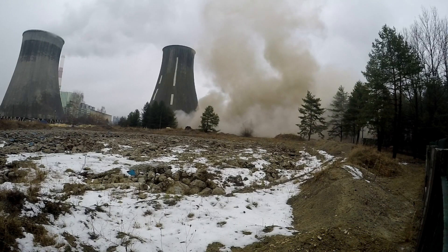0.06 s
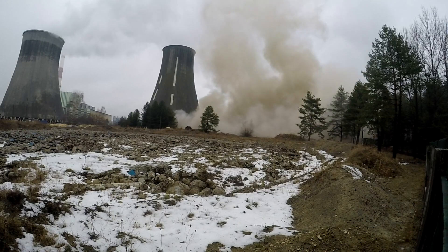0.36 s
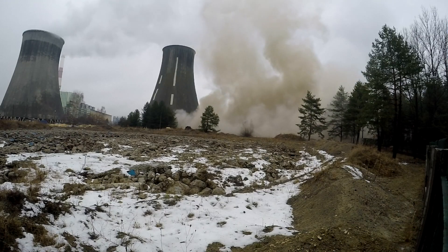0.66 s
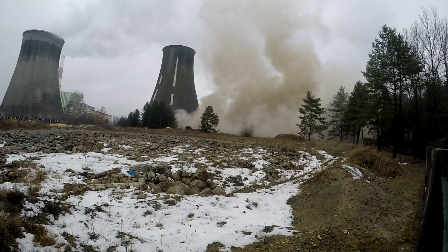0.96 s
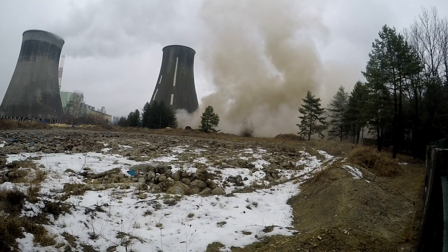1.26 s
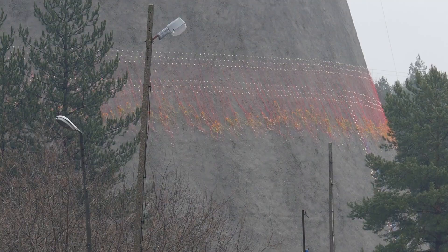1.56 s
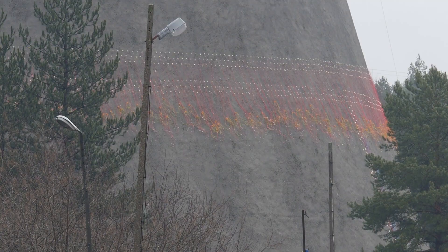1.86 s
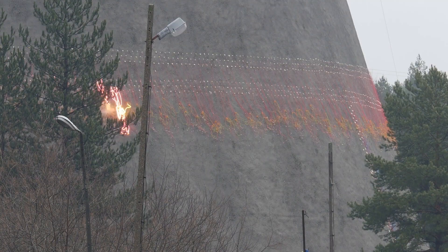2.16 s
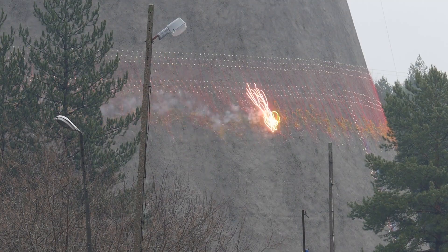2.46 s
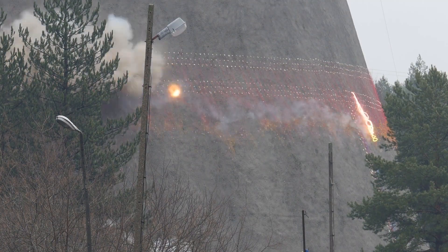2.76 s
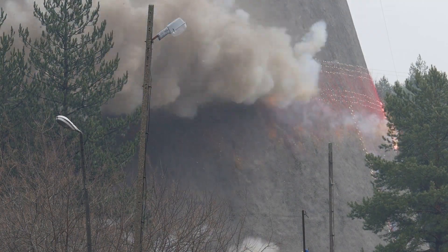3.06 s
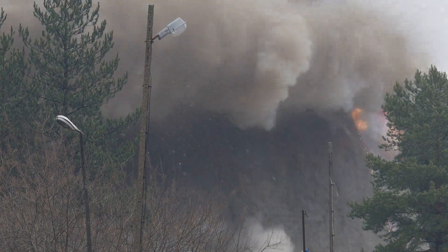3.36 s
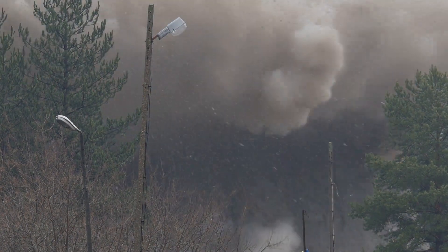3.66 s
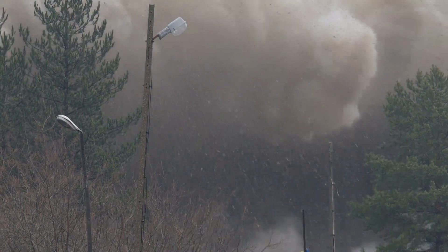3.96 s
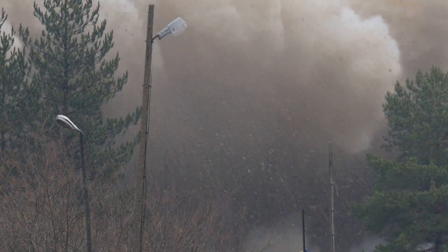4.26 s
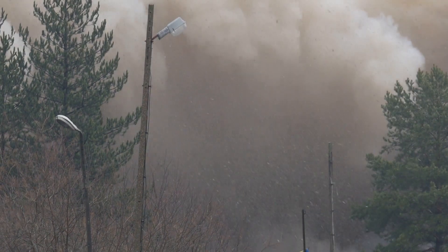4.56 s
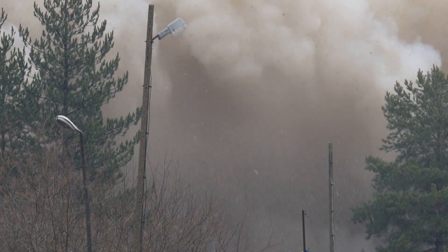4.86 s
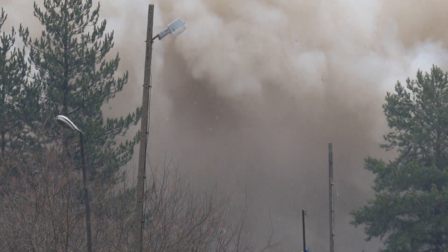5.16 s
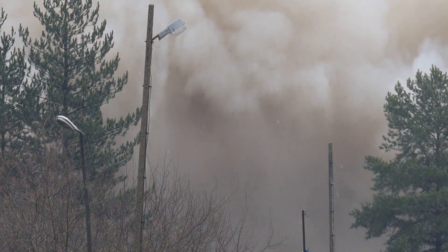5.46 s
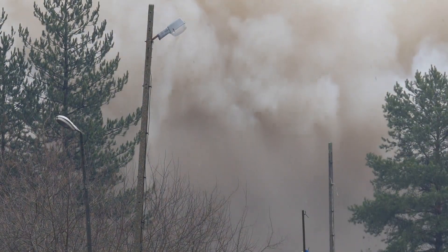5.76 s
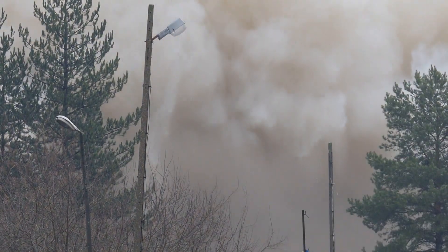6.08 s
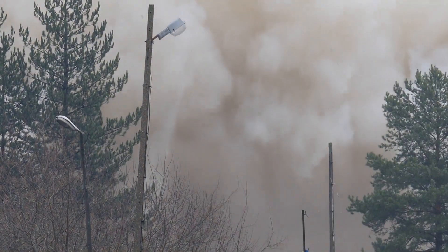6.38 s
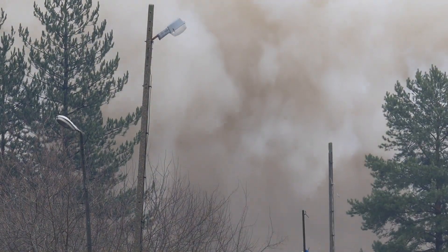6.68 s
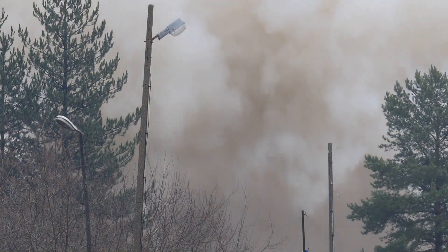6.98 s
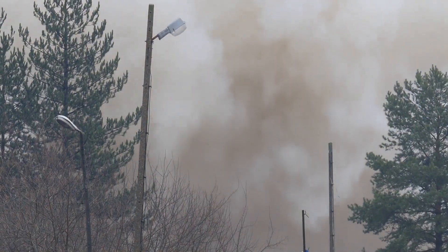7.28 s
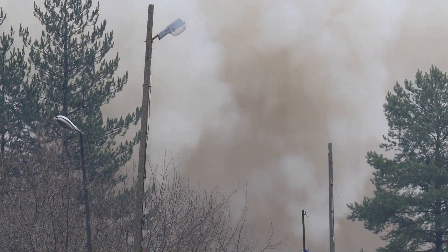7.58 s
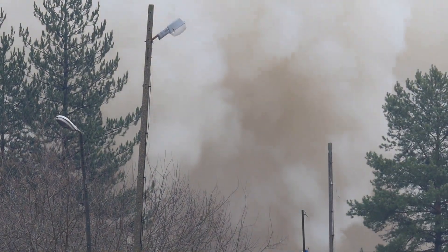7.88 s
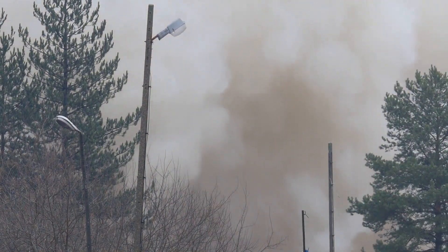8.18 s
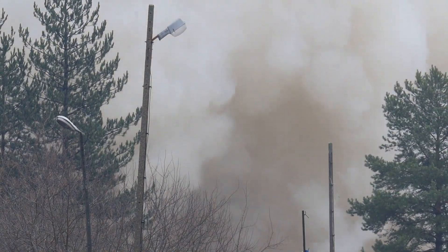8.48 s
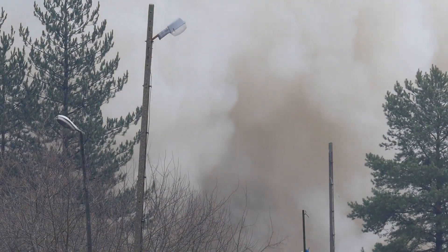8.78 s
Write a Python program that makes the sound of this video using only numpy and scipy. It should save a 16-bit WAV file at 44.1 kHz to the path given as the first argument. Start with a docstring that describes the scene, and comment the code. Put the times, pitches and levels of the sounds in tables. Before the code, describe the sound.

Outdoors at a demolition site, a faint breeze is followed by steady airy noise and a far machine hum. Suddenly explosives fire with a loud bang, a rapid string of smaller blasts and deep booms. The concrete tower comes down some way from the microphone, crackling and thudding inside a continuous low roar. The cracks thin out, leaving a few small ticks and a muffled rumble.

```python
"""A concrete cooling tower is blown down, heard across open winter ground. First comes a quiet field with
light wind; at 1.5 s it gives way to the closer air of the site, where distant machinery hums. Near 2.9 s
one hard bang sets off a ripple of delayed charges and two deep booms. Then the shell collapses: countless
dull impacts superpose into a long roar, and the strongest steepen into crackling shock fronts. These thin
out, a few last fragments tick near 7 s, and the roar ends blurred by scattering from ground and trees."""
import sys
import numpy as np
from scipy import signal
from scipy.fft import rfft, irfft
from scipy.io import wavfile
from scipy.ndimage import uniform_filter1d, minimum_filter1d

SR = 44100
rng = np.random.default_rng(int(sys.argv[2]) if len(sys.argv) > 2 else 0)


def to_wav(s):
    """Save 16-bit WAV."""
    ch = np.atleast_2d(s).T  # columns
    pcm = np.round(np.clip(ch, -1, 1) * 32767)  # PCM
    wavfile.write(sys.argv[1], SR, pcm.astype(np.int16))


N = 393813
T = np.arange(N) / SR
SITE_S = 1.54  # the open field gives way to the site


def undb(db):
    """Amplitude ratio of a level; the levels in the tables are relative."""
    return 10 ** (np.asarray(db) / 20)


def unit(x):
    """Normalisation to an rms of 1."""
    return x / np.sqrt(np.mean(x ** 2))


def curve(points):
    """Linear interpolation of (time, value) points."""
    return np.interp(T, *np.transpose(points))


def response(points, size=4096):
    """Minimum phase: the tightest causal pulse with a given spectrum."""
    hz, db = np.transpose(points)
    bins = np.maximum(np.arange(size // 2 + 1) * SR / size, 1)
    magnitude = undb(np.interp(np.log(bins), np.log(hz), db))
    cepstrum = irfft(np.log(magnitude))
    cepstrum[1:size // 2] *= 2
    cepstrum[size // 2 + 1:] = 0
    return irfft(np.exp(rfft(cepstrum)))


def colour(x, points):
    """Convolution imposes a spectrum on a signal."""
    return signal.oaconvolve(x, response(points))[:N]


def band(x, lo_hz, hi_hz, order=3):
    """Zero-phase filtering passes a band without delay."""
    sos = signal.butter(order, [lo_hz, min(hi_hz, .45 * SR)], "band", fs=SR, output="sos")
    return signal.sosfiltfilt(sos, x, padtype="even", padlen=SR // 2)


def resonance(x, hz, width_hz):
    """A second-order resonator passes a narrow band."""
    return signal.lfilter(*signal.iirpeak(hz, hz / width_hz, fs=SR), x)


def smear(x, hz):
    """Dispersion: an all-pass spreads a steep front over a fraction of a millisecond."""
    pole = np.exp(-2 * np.pi * hz / SR)
    return signal.lfilter([-pole, 1], [1, -pole], x)


def walk(per_s):
    """Smoothed random steps give a slow fluctuation of rms 1."""
    k = int(SR / per_s)
    steps = np.repeat(rng.standard_normal(N // k + 1), k)
    return unit(uniform_filter1d(uniform_filter1d(steps, k), k)[:N])


def impulses(events):
    """One spike per (time, level) event; each arrival is shifted at random by a few samples."""
    times, db = np.transpose(events)
    spikes = np.zeros(N)
    arrivals = np.round(times * SR).astype(int) + rng.integers(-3, 4, len(times))
    np.add.at(spikes, arrivals, undb(db))
    return spikes


def debris(per_s, spread_db):
    """A Poisson process: blows at random moments, many small and a few large."""
    happens = rng.random(N) < per_s / SR
    return happens * undb(spread_db * np.minimum(rng.exponential(size=N), 3.5))


def shocks(spikes, spectrum):
    """Impulse response: each spike becomes a slightly dispersed pressure pulse."""
    return smear(colour(spikes, spectrum), hz=2220) / np.abs(response(spectrum)).max()


def scatter(spikes, t60_s):
    """Scattering from ground and trees turns each spike into a dying tail of equal energy."""
    keep = np.exp(-2 * np.log(1000) / (t60_s * SR))
    power = signal.lfilter([1 - keep], [1, -keep], spikes ** 2 + 1e-18)
    return np.sqrt(power) * rng.standard_normal(N)


def stereo(mid, other, width, lean):
    """Interaural differences: a second signal gives width, unequal levels lean each band to one side."""
    side = colour(other, width)
    left = colour(mid + side, [(hz, db / 2) for hz, db in lean])
    right = colour(mid - side, [(hz, -db / 2) for hz, db in lean])
    return np.array([left, right])


def air(spectrum, db, flutter_db):
    """Outdoor ambient noise, with optional slow amplitude modulation."""
    return unit(colour(rng.standard_normal(N), spectrum)) * undb(db + flutter_db * walk(4.4))


def hum(hz, db, drift, waver_db):
    """Propagation through the air makes a far tone waver in pitch and level."""
    phase = 2 * np.pi * np.cumsum(hz * (1 + drift * walk(14))) / SR
    return np.sqrt(2) * np.sin(phase) * undb(db + waver_db * walk(9.65))


# Field air, its width (side minus mid), and the tones of a far mains hum: f/Hz, level/dB
FIELD_AIR = [(15, -10), (42, -2), (70, -8), (125, -19), (175, -15), (230, -22), (500, -19.5), (850, -16.5),
             (2100, -24), (2500, -29), (4150, -31.5), (4650, -34), (5150, -29.5), (7400, -45.5),
             (14000, -61)]
FIELD_WIDTH = [(60, -39), (300, -34), (1000, -47), (8000, -29)]
MAINS_TONES = [(49.5, -50), (100, -59), (360.5, -68), (721.5, -66), (3133, -71)]
def field():
    """Wind modulates the bass of the ambient noise, beside a mains hum and a thin high whine."""
    tones = sum(hum(hz, db, drift=.004, waver_db=2.5) for hz, db in MAINS_TONES)
    whine = undb(-82) * unit(band(rng.standard_normal(N), 8400, 8650))
    mid, other = (air(FIELD_AIR, db=-44, flutter_db=.4) for _ in range(2))
    side = colour(other, FIELD_WIDTH)
    gusts = unit(undb(4.5 * walk(per_s=7.4)))
    buffets = band(mid, 20, 110) * (gusts - 1)
    return np.array([mid + side, mid - side]) + buffets + tones + whine


# Site air, its width (side minus mid) and its lean (left minus right): f/Hz, level/dB
SITE_AIR = [(21, -67), (35, -25.5), (81, -7.5), (182, -7), (217, -2), (280, -5.5), (453, -3), (1020, -6.5),
            (1160, -5.5), (2020, -14.5), (4220, -20.5), (7760, -29), (10300, -25), (13900, -41.5),
            (15000, -91)]
SITE_WIDTH = [(100, -24.5), (300, -20), (700, -3), (1300, 3), (8000, 1), (15000, -9)]
SITE_BALANCE = [(700, 0), (1300, -5.5), (2400, 4.5), (4400, 10.5), (8000, 0.5)]
# Machinery tones: f/Hz, level/dB, slope over the first two seconds at the site/(dB/s)
MACHINE_TONES = [(225.5, -36.5, -12), (452, -34.3, -15), (567, -40, 0), (1181, -44.5, -1), (1364, -50, 0),
                 (1672, -53, -2)]
def site():
    """The line spectrum of distant machinery stands on the continuous spectrum of rushing air."""
    since_s = np.clip(T - SITE_S, 0, 2)
    tones = sum(hum(hz, db + slope * since_s, drift=.0025, waver_db=1.5)
                for hz, db, slope in MACHINE_TONES)
    mid, other = (air(SITE_AIR, db=-30, flutter_db=0) for _ in range(2))
    return stereo(mid, other, SITE_WIDTH, SITE_BALANCE) + tones


# Landings of the last small fragments: t/s, level/dB
FRAGMENT_HITS = [(7.0385, -32), (7.0765, -35), (7.145, -27.5), (7.1672, -26), (7.234, -30.5)]
# Spectrum of one landing: f/Hz, level/dB
FRAGMENT_SPECTRUM = [(300, -20), (2000, -6), (3100, 11), (4200, -7), (6500, -18), (10000, -24),
                     (14000, -41)]
def fragments():
    """Impact excitation: each stray fragment clicks, rattles briefly and rings."""
    spikes = impulses(FRAGMENT_HITS)
    return shocks(spikes + undb(-1) * scatter(spikes, t60_s=.022), FRAGMENT_SPECTRUM)


# The delayed charges, and the gain of their strident upper mids: t/s, level/dB
CHARGE_ARRIVALS = [(2.96, -5.5), (2.974, -8.5), (2.9793, -7.5), (2.989, -16), (2.999, -8.5), (3.009, -22),
                   (3.015, -16.5), (3.021, -10.5), (3.030, -9), (3.037, -12.5), (3.046, -12.5),
                   (3.0542, -10), (3.068, -12), (3.0711, -16), (3.081, -17), (3.090, -15), (3.099, -16),
                   (3.106, -15), (3.1123, -18), (3.1155, -28)]
CHARGE_STRIDENCY = [(2.95, -2), (3.0, 2.5), (3.05, 4), (3.09, 3.5)]
# Spectrum of one charge: f/Hz, level/dB
CHARGE_SPECTRUM = [(30, -22), (130, -9), (280, 3), (400, -2), (560, -1.5), (670, 1.5), (800, -3),
                   (1150, -1.5), (1400, -7), (1700, -4.5), (2300, -9.5), (2700, -11.5), (3180, -11),
                   (3450, -17), (4000, -17.5), (5000, -24), (10000, -40.5), (15000, -82)]
def ripple(bang_s):
    """Multipath propagation: each charge arrives as a short sheaf of reflections."""
    opening = [(bang_s - .00355, -8), (bang_s, -2)]  # a small charge just ahead; the bang's reflections
    charges = impulses(opening) + impulses(CHARGE_ARRIVALS)
    age = T[:SR // 10]
    rise_s, decay_s, tail_s = .001, .0024, .02
    sheaf = (1 - np.exp(-age / rise_s)) * (np.exp(-age / decay_s) + .059 * np.exp(-age / tail_s))
    envelope = signal.oaconvolve(charges, sheaf)[:N] * undb(3.5)
    envelope /= np.linalg.norm(response(CHARGE_SPECTRUM))
    mid, side = (colour(envelope * rng.standard_normal(N), CHARGE_SPECTRUM) for _ in range(2))
    return mid + band(mid, 1130, 2300) * (undb(curve(CHARGE_STRIDENCY)) - 1), side


# The opening bang, and the deep booms of the main charges: t/s, level/dB
BANG_ARRIVALS = [(2.9395, 9.5)]
BOOM_ARRIVALS = [(3.077, -0.5), (3.125, -1)]
# Their spectra: f/Hz, level/dB
BANG_SPECTRUM = [(30, -44), (90, -13), (220, 12), (450, -10), (660, 10.5), (1250, -21), (3000, -3),
                 (4300, -5), (6000, -53), (11000, -56), (15000, -63)]
BOOM_SPECTRUM = [(25, -17), (60, -11), (125, 5.5), (220, -10), (550, -12), (1200, -30), (3000, -37),
                 (14000, -76)]
def blast():
    """Blast waves: a hard bang, a ripple of charges about ten milliseconds apart, and two deep booms."""
    bang, booms = impulses(BANG_ARRIVALS), impulses(BOOM_ARRIVALS)
    mid, side = ripple(bang_s=BANG_ARRIVALS[0][0])
    direct = shocks(bang, BANG_SPECTRUM) + shocks(booms, BOOM_SPECTRUM)
    scattered = undb(-26) * shocks(scatter(bang, t60_s=.01), BANG_SPECTRUM)
    return mid - direct, side + scattered


# Blurring of the fall: t/s, indirect share (0 to 1)
INDIRECT_SHARE = [(6.5, 0), (7.4, 1)]
def direct_share():
    """The direct share falls to zero: the last of the fall arrives only by way of ground and trees."""
    return 1 - curve(INDIRECT_SHARE)


# Strength of the crackle: t/s, level/dB
CRACKLE_LEVEL = [(3.25, -61), (3.49, -46), (3.53, -32.5), (3.7, -35.5), (3.8, -36), (4.1, -34.5),
                 (4.26, -42), (4.38, -37.5), (4.8, -44), (5.25, -42.5), (5.4, -61), (5.62, -43.5),
                 (5.8, -48), (6.1, -44), (6.3, -67), (6.4, -43), (6.5, -58), (7.4, -67)]
def crackle_gain():
    """Amplitude envelope of the crackle of breaking concrete."""
    return undb(np.interp(T, *np.transpose(CRACKLE_LEVEL), left=-np.inf))


# Cracks of breaking concrete, and the gain of their treble: t/s, level/dB
CRACK_ARRIVALS = [(3.38, -17.5), (3.418, -14), (3.4641, -8), (3.5134, -7), (3.5174, -5), (3.5236, -4),
                  (3.54, -4), (3.5441, 0), (3.552, -10), (3.5586, -8.0), (3.5626, -10.0), (3.5707, -6),
                  (3.58, -5), (3.5984, -6), (3.6059, -9.5), (3.6135, -12), (3.618, -9.0), (3.6315, -6.0),
                  (3.6396, -2.5), (3.646, -10), (3.6667, -9.5), (3.6759, -6.5), (3.686, -3.5), (3.7174, -7),
                  (3.724, -5.5), (3.747, -14), (3.9197, -13), (3.9689, -8.5), (3.9849, -11), (4.0083, -9),
                  (4.0398, -8.5), (4.0433, -4.5), (4.0765, -6), (4.0805, -11), (4.094, -6.5), (4.1, -8),
                  (4.1108, -15), (4.122, -16), (4.1241, -8.5), (4.1354, -7.5), (4.1691, -7), (4.1873, -9.5),
                  (4.3288, -12), (4.333, -8), (4.3392, -7.5), (4.3446, -9), (4.3775, -13), (4.408, -10.0),
                  (4.445, -10), (4.465, -13), (4.472, -10), (4.482, -7.5), (4.4975, -10.0), (4.5219, -8.5),
                  (4.5795, -10), (4.6772, -7.5), (4.719, -7), (4.7691, -13), (4.786, -10), (4.874, -7),
                  (4.902, -12), (4.9113, -7.5), (5.0035, -9), (5.0393, -8.5), (5.0872, -10), (5.0939, -8.5),
                  (5.105, -12.0), (5.12, -16), (5.2371, -6), (5.243, -17), (5.258, -4.5), (5.3562, -13.0),
                  (5.7148, -10.5), (5.7352, -11), (5.7593, -8), (5.7802, -8), (5.8126, -4.0), (5.855, -3.5),
                  (5.8773, -12.5), (5.8915, -8.5), (5.9204, -6), (5.9413, -3.5), (5.9434, -16),
                  (5.968, -10), (5.971, -5), (5.9745, -9), (5.9863, -10.0), (6.001, -6.5), (6.0067, -10),
                  (6.034, -15), (6.0463, -6.5), (6.051, -6), (6.0576, -10), (6.0719, -10), (6.0935, -9.5),
                  (6.1111, -4), (6.1242, -14), (6.1377, -8.5), (6.1456, -7.5), (6.1791, -8), (6.1831, -6.5),
                  (6.1869, -8), (6.1943, -10.0), (6.2003, -9.5), (6.2385, -10), (6.2633, -7.5),
                  (6.2675, -8.5), (6.2786, -12.5), (6.3767, -4), (6.3854, -9), (6.3915, -3), (6.3968, -7.5),
                  (6.4001, -10.5), (6.4053, -9), (6.4363, -8), (6.5261, -10), (6.5489, -13.5),
                  (6.5929, -15.5), (6.7729, -10), (6.855, -14.5)]
CRACK_BRIGHTNESS = [(3.5, 0.5), (4.2, 3.5), (5.7, -13), (6.15, 0.5), (6.8, -17)]
# Spectrum of one crack: f/Hz, level/dB
CRACK_SPECTRUM = [(30, -58), (60, -36), (120, -8), (200, 1.5), (330, -2), (520, -8.5), (1100, -17.5),
                  (3000, -20.5), (4200, -26), (5500, -29.5), (8000, -29.5), (10500, -26), (14000, -43),
                  (16000, -61)]
def cracks():
    """Nonlinear steepening: the stronger a front, the more of it becomes a shock; the rest stays round."""
    stray_gain = undb(2) * direct_share() * np.sqrt(crackle_gain())
    fronts = impulses(CRACK_ARRIVALS) + stray_gain * debris(per_s=110, spread_db=1.5)
    steep = fronts * np.sqrt(np.minimum(fronts / undb(-6.5), 1))
    rounded = band(shocks(fronts - steep, CRACK_SPECTRUM), 20, 2500, order=2)
    sharp = shocks(steep + undb(-18) * scatter(steep, t60_s=.02), CRACK_SPECTRUM)
    sharp += band(sharp, 8400, 18000) * (undb(curve(CRACK_BRIGHTNESS)) - 1)
    side = undb(-.5) * shocks(scatter(steep, t60_s=.0038), CRACK_SPECTRUM)
    return undb(2.5) * sharp + undb(.5) * rounded, side


# Landings of heavy slabs: t/s, level/dB
SLAB_HITS = [(3.15, -11), (3.353, -11), (3.379, -4), (3.417, -8), (3.816, -6), (3.914, -4.5), (3.943, -8),
             (4.522, -9.5), (4.768, -9), (4.85, -8), (4.872, -9), (4.882, -7.5), (5.02, -8.5),
             (5.119, -6.5), (5.629, -3.5), (5.726, -11), (5.8125, -8), (6.364, -9), (6.3914, -10.5),
             (6.551, -7), (6.756, -13), (6.772, -3.5), (6.853, -5), (7.149, -8), (7.202, -8.5), (7.49, -11),
             (7.764, -8)]
# Spectrum of one landing: f/Hz, level/dB
SLAB_SPECTRUM = [(30, -56.5), (70, -0.5), (170, 10), (300, -2.5), (600, -13.5), (1200, -19), (3000, -23.5),
                 (6000, -40.5), (14000, -66)]
def thuds():
    """Slab impacts radiate dull pulses with scattered tails; late ones, heard indirectly, are muffled."""
    spikes = impulses(SLAB_HITS)
    pulses = shocks(spikes + undb(-7.5) * scatter(spikes, t60_s=.062), SLAB_SPECTRUM)
    clear = direct_share() ** 2
    return clear * pulses + (1 - clear) * band(pulses, 20, 800, order=2)


# Spectrum of the crackle: f/Hz, level/dB
CRACKLE_SPECTRUM = [(1000, -45), (2000, -35), (3100, -0.5), (4300, 3.5), (6000, 1), (8000, 4.5),
                    (10500, 6.5), (13500, -2.5), (15500, -13)]
def crackle(blows):
    """A square law favours the strongest blows as sharp fronts; fine splinters fill the gaps."""
    splinters = unit(debris(per_s=4400, spread_db=1.5))
    fronts = band(colour(unit(blows ** 2) + splinters, CRACKLE_SPECTRUM), 800, 18000)
    clumps = undb(2 * walk(per_s=36))
    return undb(-4.5) * direct_share() * crackle_gain() * unit(fronts * clumps)


# Ground shudder under the fall: t/s, level/dB
SHUDDER_LEVEL = [(3.04, -74.5), (3.12, -21.5), (3.4, -25.5), (3.6, -23.5), (3.95, -22.5), (4.2, -28),
                 (4.65, -22), (4.95, -31.5), (5.3, -27.5), (5.58, -20.5), (5.85, -30), (6.25, -31.5),
                 (7.25, -27.5), (7.5, -50), (7.8, -24.5), (8.4, -38.5), (8.93, -41.5)]
def shudder():
    """Ground vibration radiates a low band of noise."""
    return unit(band(rng.standard_normal(N), 46, 161)) * undb(curve(SHUDDER_LEVEL))


# Course of the fall: t/s, level/dB, relative level of small debris/dB
FALL_LEVELS = [(3.14, -24, 2), (3.29, -25, 4), (3.38, -21, 6.5), (3.48, -21.5, 4), (3.54, -18.5, 1.5),
               (3.84, -19.5, 2.5), (3.92, -14.5, 0.5), (4.04, -20.5, 5), (4.29, -16.5, -1),
               (4.48, -18.5, 4), (4.77, -19.5, -0.5), (5.02, -15, -3.5), (5.2, -17.5, 0.5),
               (5.62, -14.5, -2.5), (6.25, -23.5, -1), (7.0, -22, -4), (7.33, -23, -2.5),
               (7.48, -19.5, -7.5), (7.62, -21.5, -4), (7.76, -14, -10.5), (7.92, -17, -6.5),
               (8.93, -15, -8.5)]
# Spectrum of the roar, and the treble loss on the indirect path: f/Hz, level/dB
ROAR_SPECTRUM = [(25, -43.5), (58, -21), (100, -11), (178, 0.5), (275, -5.5), (350, -10.5), (450, -10),
                 (560, -9.5), (1200, -23.5), (1600, -23), (3100, -33.5), (4300, -41), (5700, -49),
                 (8000, -57), (10500, -56), (14000, -83)]
INDIRECT_LOSS = [(2000, -0.5), (3500, -3), (5500, -8), (12000, -10)]
def roar():
    """Superposition: countless blows merge into a grainy roar, until scattering blurs it to smooth noise."""
    times, *columns = np.transpose(FALL_LEVELS)
    fall_db, small_db = (np.interp(T, times, column) for column in columns)
    direct = direct_share()
    blows = debris(per_s=1900, spread_db=4)
    diffuse = colour(rng.standard_normal(N), INDIRECT_LOSS)
    grain = np.sqrt(direct) * unit(blows - blows.mean()) + np.sqrt(1 - direct) * diffuse
    body = colour(grain, ROAR_SPECTRUM)
    slabs = undb(fall_db - .8) * unit(band(body, 22, 362))
    chunks = undb(fall_db - 6.5 + .55 * small_db) * unit(band(body, 343, 1227))
    rubble = undb(fall_db - 13.5 + small_db) * unit(band(body, 1110, 12000))
    fall = smear(slabs + chunks + rubble + crackle(blows), hz=1500)
    return (fall + shudder()) * np.interp(T, [3.04, 3.13], [0, 1])


# Width (side minus mid) and lean (left minus right) of the tower's sound: f/Hz, level/dB
TOWER_WIDTH = [(200, -45), (380, -29.5), (700, -9.5), (1300, -2), (2400, -6), (4400, -1.5), (8000, -4),
               (15000, -12)]
TOWER_BALANCE = [(380, 0), (1300, 2.5), (4400, 3), (10000, 1.5)]
def tower():
    """The pressures of blast and collapse add at the two ears, with a faint high resonance."""
    blast_mid, blast_side = blast()
    crack_mid, crack_side = cracks()
    mid = blast_mid + crack_mid + thuds() + fragments() + roar()
    side = blast_side + crack_side + roar()  # an uncorrelated roar gives width
    ears = stereo(mid, side, TOWER_WIDTH, TOWER_BALANCE)
    return ears + undb(-10) * resonance(ears, hz=3140, width_hz=120)


def scene():
    """Field, site, blast and collapse in turn; the background drops away at the first bang."""
    at_site = np.clip((T - SITE_S) / .0012, 0, 1)
    duck_db = np.interp(T, [2.94, 3.12, 6.5], [0, -17, -30])
    return tower() + (1 - at_site) * field() + at_site * undb(duck_db) * site()


def limiter(x, size=12):
    """Peak limiting: both channels dip for a fraction of a millisecond where a peak passes full scale."""
    gain = 1 / np.maximum(np.abs(x).max(axis=0), 1)
    return x * uniform_filter1d(minimum_filter1d(gain, size), size)


def record(dry):
    """The microphone's response has a narrow treble notch; peaks are limited and the top is cut."""
    held = limiter(dry - .8 * resonance(dry, hz=7870, width_hz=240))
    return signal.sosfilt(signal.ellip(8, .2, 70, 16000, fs=SR, output="sos"), held)


dry = scene()
out = record(dry)
to_wav(out)
```